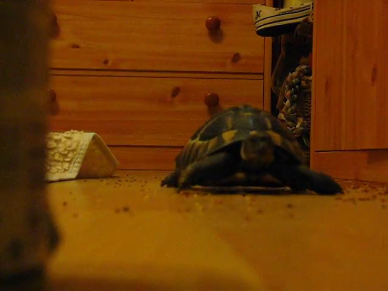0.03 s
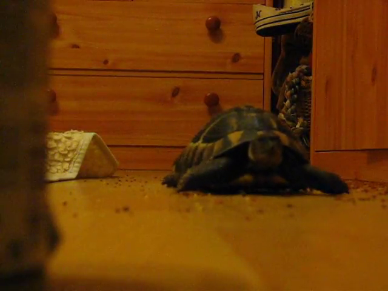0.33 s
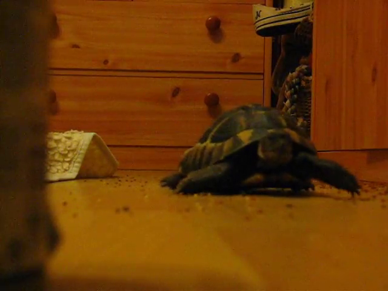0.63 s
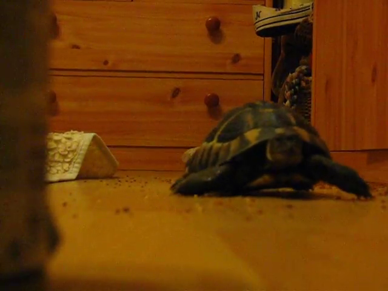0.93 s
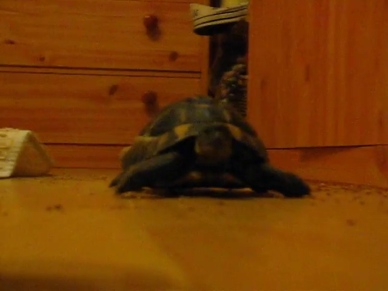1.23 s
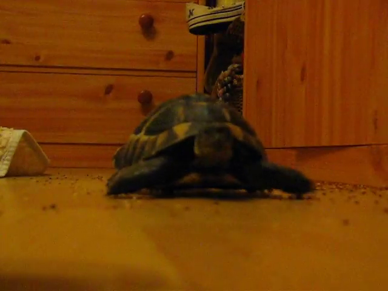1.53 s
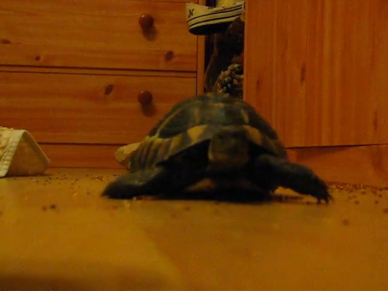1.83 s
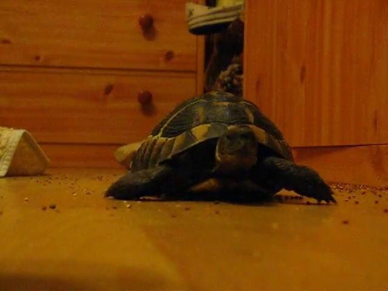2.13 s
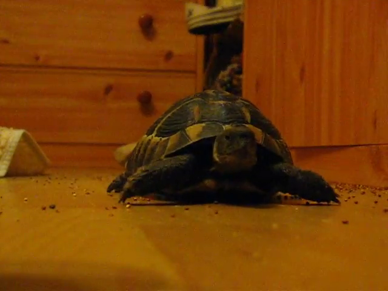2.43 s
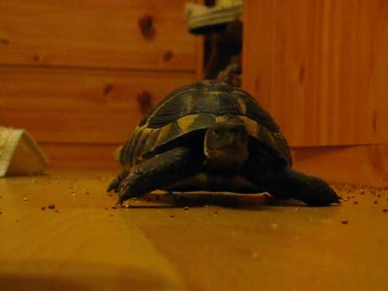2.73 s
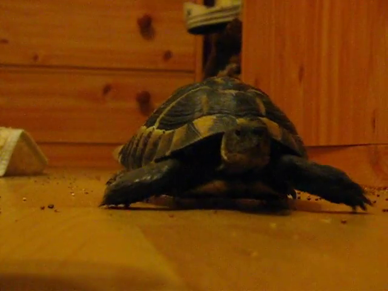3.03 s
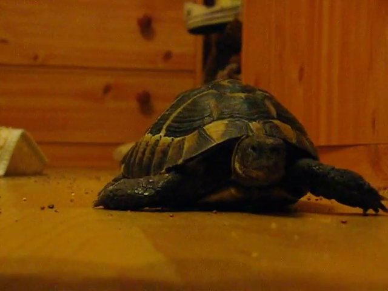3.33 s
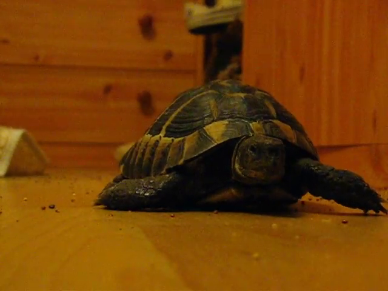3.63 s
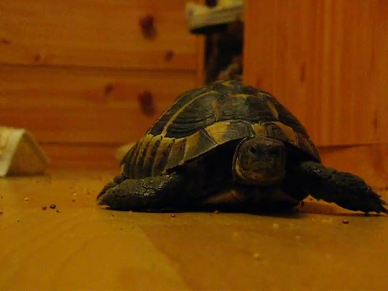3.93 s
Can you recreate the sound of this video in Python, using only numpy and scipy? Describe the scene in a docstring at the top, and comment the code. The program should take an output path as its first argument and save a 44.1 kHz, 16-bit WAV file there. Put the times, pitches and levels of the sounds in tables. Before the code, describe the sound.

A tortoise scrapes and shuffles over a wooden floor, with a few sharp knocks.

```python
"""Uneven, gritty scraping in a quiet room: a tortoise drags its claws and shell over a wooden floor.
Its claws click on grit, and now and then a foot sticks and slips, making the hollow shell judder.
Scattered knocks ring the boards and bunch up near the end, around two close, crackling scrapes
on the left. Faint room noise, hum and whir lie underneath. An automatic volume control turns
everything down after the loudest sounds, then slowly back up."""
import sys
import numpy as np
from scipy import signal
from scipy.fft import rfft, irfft
from scipy.io import wavfile
from scipy.ndimage import uniform_filter1d

SR = 44100
rng = np.random.default_rng(int(sys.argv[2]) if len(sys.argv) > 2 else 0)


def waveform_to_disk(signal):
    """Save audio, clipped to [-1, 1], as 16-bit WAV at the path in sys.argv[1]."""
    frames = np.transpose(np.atleast_2d(signal))
    scaled = np.clip(frames, -1, 1) * 32767
    samples = np.round(scaled).astype(np.int16)
    wavfile.write(sys.argv[1], SR, samples)


N = 176400
T, HZ = np.arange(N) / SR, np.fft.rfftfreq(N, 1 / SR)

# How much louder distant sounds are on the left: pitch_hz, left_minus_right_db
FAR_SIDE_BALANCE = [(100, -1), (750, 0), (2000, -1), (3300, -5), (5500, 0), (9000, -7), (12500, 5.5),
                    (15000, 1)]


def amp(db):
    """Turn decibels into a multiplier."""
    return 10 ** (np.asarray(db) / 20)


def unit(x):
    """Scale a signal to an average power of 1."""
    return x / np.sqrt(np.mean(x ** 2) + 1e-20)


def read(points, hz):
    """Look up a value between the rows of a table, on a musical pitch scale."""
    pitch_hz, value = np.transpose(points)
    return np.interp(np.log(hz + 1), np.log(pitch_hz + 1), value)


def colour(x, tone):
    """Filter a sound to a tone curve; only the curve's shape counts, not its overall level."""
    log_gain = np.log(amp(read(tone, abs(np.fft.fftfreq(4096, 1 / SR)))))
    response = np.exp(np.conj(signal.hilbert(log_gain)))  # rings after a click, never before
    taps = np.fft.ifft(response).real[:2048]
    return signal.oaconvolve(x, taps / np.linalg.norm(taps))[:N]


def drift(rate_hz):
    """A random wobble, mostly slower than rate_hz."""
    return unit(irfft(rfft(rng.standard_normal(N)) / (1 + (HZ / rate_hz) ** 4), N))


def clicks(times_s, levels_db):
    """One sharp spike for each contact."""
    x = np.zeros(N)
    x[np.clip(np.round(times_s * SR).astype(int), 0, N - 1)] = amp(levels_db)
    return x


def resonate(x, hz, width_hz):
    """Pick out a band of sound around a moving pitch."""
    turn = np.exp(2j * np.pi * np.cumsum(hz) / SR)
    hold = np.exp(-np.pi * width_hz / SR)
    return 2 * (turn * signal.lfilter([1 - hold], [1, -hold], x / turn + 1e-18)).real


def pan(pair, balance, left_lead_s=0):
    """Set how much louder and earlier a sound is on one side."""
    half = amp(read(balance, HZ) / 2) * np.exp(1j * np.pi * HZ * left_lead_s)
    return irfft(rfft(pair) * np.array([half, 1 / half]), N)


def room(x, near_db, near_s, tail_db, tail_s):
    """Add quick echoes from nearby surfaces and a tail that fades 60 dB in tail_s."""
    t = np.arange(SR // 2) / SR
    noise = rng.standard_normal((4, len(t)))
    low = signal.butter(2, 650, fs=SR, output="sos")
    high = signal.butter(2, 650, "high", fs=SR, output="sos")
    scatter = signal.sosfilt(high, noise[:2]) + signal.sosfilt(low, noise[2])  # both sides share the bass
    near = scatter * np.exp(-t / near_s)
    tail = scatter * amp(-60 * t / tail_s) * (t > .007)
    echo = sum(amp(db) * part / np.linalg.norm(part, axis=1, keepdims=True)
               for db, part in [(near_db, near), (tail_db, tail)])
    reflected = signal.oaconvolve(x[None], echo, axes=1)[:, :N]
    return (x + reflected) / np.sqrt(1 + (echo ** 2).sum() / 2)


def moving_echoes(x, step_s, spots, **echoes):
    """Fade from one set of echoes to the next as the point of contact moves."""
    offsets = (T / step_s - np.arange(spots)[:, None] + 1) % spots - 1
    fades = np.cos(np.pi / 2 * np.minimum(abs(offsets), 1))
    return sum(room(x * fade, **echoes) for fade in fades)


def friction(grains_per_s, spread_db, smooth):
    """Grit catches in grains of uneven size over a smooth rub, under a fluttering pressure."""
    catches = rng.random(N) < grains_per_s / SR
    sizes = amp(spread_db * np.minimum(rng.exponential(1, N), 4.5))
    grains = unit(catches * sizes * rng.choice([-1, 1], N))
    rub = smooth * rng.standard_normal(N)
    pressure = amp(1.58 * drift(rate_hz=71.6))
    return unit((grains + rub) * pressure)


def scrape(strokes, hiss_tone, fade_shape, **grain):
    """Each stroke over grit swells and fades as a ringing hiss, a low grind and a fine fizz."""
    # Tone of the low grind and of the high fizz: pitch_hz, level_db
    grind_tone = [(60, 0.5), (180, -15), (350, 2.5), (600, -4), (1100, -4), (1700, -6), (2500, -3),
                  (3600, -7.5), (6000, -17), (12000, -60)]
    fizz_tone = [(4000, -36), (8000, -10), (9500, 1.5), (10700, -1.5), (12000, 2.5), (14000, -6.5),
                 (15800, -16)]
    peak_s, rise_s, fall_s, hiss_db, grind_db, fizz_db, pitch_hz = np.transpose(strokes)
    from_peak = np.maximum((peak_s - T[:, None]) / rise_s, (T[:, None] - peak_s) / fall_s)
    # The power is 10 dB down at rise_s before the peak and at fall_s after it.
    swell = 10 ** -(np.minimum(from_peak, 10) ** fade_shape) + 1e-12
    hiss_gain, grind_gain, fizz_gain = (np.sqrt(swell @ amp(db) ** 2)
                                        for db in (hiss_db, grind_db, fizz_db))
    ring_hz = swell @ (pitch_hz * amp(hiss_db) ** 2) / hiss_gain ** 2  # louder strokes count for more
    grit = friction(**grain)
    hiss = colour(grit, hiss_tone)
    hiss = unit(hiss + amp(3) * resonate(hiss, ring_hz, width_hz=1300))
    grind = colour(friction(**grain), grind_tone)
    fizz = colour(unit(grit + friction(**grain)), fizz_tone)
    return hiss_gain * hiss + grind_gain * grind + fizz_gain * fizz


def shuffle():
    """Feet and shell drag over the floor while claws click on grit."""
    # Foot and shell strokes: peak_s, rise_s, fall_s, hiss_db, grind_db, fizz_db, pitch_hz
    strokes = [(0.005, 0.0073, 0.019, -42, -47, -70, 5900), (0.235, 0.065, 0.032, -42.5, -61, -59, 6600),
               (0.325, 0.073, 0.11, -39, -64.5, -55, 6150), (0.475, 0.028, 0.0073, -36.5, -43, -64, 6400),
               (0.545, 0.044, 0.035, -43.5, -52, -54, 5900), (0.63, 0.044, 0.03, -29.5, -40.5, -56, 4900),
               (0.722, 0.041, 0.018, -40.5, -41, -55, 5100), (0.985, 0.057, 0.093, -41.5, -58, -58, 8200),
               (1.047, 0.018, 0.022, -31, -43.5, -49, 6100), (1.1, 0.042, 0.056, -31, -53, -47.5, 7240),
               (1.165, 0.043, 0.037, -31, -35.5, -44.5, 7200), (1.235, 0.086, 0.03, -38.5, -41, -58, 5750),
               (1.49, 0.043, 0.038, -37.5, -64, -63, 5300), (1.535, 0.022, 0.047, -36.5, -50, -59, 5240),
               (1.64, 0.041, 0.047, -30.5, -42, -47.5, 5050), (1.715, 0.056, 0.032, -34.5, -38, -56, 6300),
               (1.82, 0.049, 0.067, -44, -48, -70, 6500), (1.878, 0.02, 0.0098, -45, -38.5, -58, 6200),
               (2.125, 0.075, 0.021, -40, -45, -57, 5900), (2.185, 0.056, 0.042, -36.5, -62, -52.5, 6600),
               (2.388, 0.07, 0.064, -40.5, -39.5, -60, 6360), (2.452, 0.032, 0.027, -26.5, -60, -50, 6640),
               (2.535, 0.037, 0.033, -26, -49, -43, 6400), (2.635, 0.18, 0.049, -33.5, -42.5, -65, 5140),
               (2.805, 0.01, 0.03, -45, -60, -58, 5600), (2.915, 0.054, 0.025, -35.5, -48, -53, 5940),
               (2.952, 0.021, 0.012, -31.5, -48, -49, 7500), (3.0, 0.038, 0.048, -34.5, -43, -48.5, 5270),
               (3.092, 0.027, 0.041, -31, -46.5, -46, 6800), (3.155, 0.048, 0.031, -27, -44, -45.5, 5900)]
    # Tone of the hiss and the clicks: pitch_hz, level_db
    hiss_tone = [(500, -41), (2000, -21), (3000, -14.5), (3700, -4), (4900, 0.5), (5900, -2), (7000, 0.5),
                 (8200, -4), (9200, -15), (10600, -30), (12300, -17), (15500, -50)]
    # Claws hitting grit: start_s, level_db
    claw_hits = [(0.536, -20), (.716, -15), (1.04, -13), (1.097, -15), (1.147, -8), (1.16, -5), (1.171, -8),
                 (1.251, -10.5), (1.281, -12), (1.482, -20), (1.604, -13), (2.439, -14), (2.797, -12.5),
                 (3.085, -4), (3.239, -24), (3.339, -17), (3.351, -12.5)]
    drags = scrape(strokes, hiss_tone, fade_shape=1.02, grains_per_s=1800, spread_db=4, smooth=.5)
    claws = colour(clicks(*np.transpose(claw_hits)), hiss_tone)
    pair = moving_echoes(drags + claws, step_s=.05, spots=9,
                         near_db=4, near_s=0.0021, tail_db=-1, tail_s=0.21)
    return pan(pair, FAR_SIDE_BALANCE)


def room_noise(hum_hz=100, whir_hz=2647, whir_width_hz=320):
    """A steady soft rush with a faint electrical hum and a thin, flickering whir."""
    # Tone of the quiet room: pitch_hz, level_db
    rush_tone = [(15, -45), (25, -16.5), (113, -0.5), (199, -9.5), (282, -5.5), (509, -9), (783, -15),
                 (896, -12), (1080, -15.5), (1620, -16), (2120, -17), (2630, -17), (3830, -16), (4380, -21),
                 (5890, -17), (7510, -18), (8590, -18.5), (9830, -29.5), (15500, -38)]
    # How alike left and right are: pitch_hz, likeness (1 = the same)
    side_likeness = [(100, .98), (400, 0.98), (800, 0.67), (2500, 0.74), (5000, 0.23), (15000, 0.085)]
    middle, side, whir_noise = rfft(rng.standard_normal((3, N)))
    likeness = np.clip(read(side_likeness, HZ), 0, 1)
    side = side * np.sqrt((1 - likeness) / (1 + likeness))
    rush = unit(irfft(np.array([middle + side, middle - side]) * amp(read(rush_tone, HZ)), N))
    whir_band = irfft(whir_noise / (1 + ((HZ - whir_hz) / (whir_width_hz / 2)) ** 4), N)
    whir = unit(whir_band * np.exp(.35 * drift(rate_hz=22)))
    hum = unit(np.sin(2 * np.pi * hum_hz * T) * (1 + 0.23 * drift(rate_hz=3.3)))
    return pan(amp(-44.5) * rush + amp(-56.5) * whir + amp(-66) * hum, FAR_SIDE_BALANCE)


def knocks(low_cut_hz=120, smear_hz=1800):
    """Each knock is a short rap, duller for a softer contact, plus the thud of the ringing floor."""
    # Knocks on the floor: start_s, rap_db, thud_db, brightness_hz
    hits = [(.425, -21, -37, 1200), (0.461, -13.5, -59, 2500), (1.877, -21.5, -33, 3000),
            (2.113, -10, -44, 1500), (2.368, -16, -38, 2000), (2.382, -7, -26, 4500),
            (3.057, -14.5, -56, 4970), (3.3387, 10.5, -30, 3600), (3.4115, 4.5, -19, 1550),
            (3.429, -8, -27, 1100), (3.435, -12, -21, 600), (3.448, -16, -34, 900),
            (3.4887, -25, -16.5, 695), (3.5246, -2.5, -12, 925), (3.5315, 3, -16.5, 1880),
            (3.58, -5.5, -39, 2020), (3.918, -30, -30.5, 800), (3.972, -2, -27, 1510)]
    # Tone of a rap on wood: pitch_hz, level_db
    rap_tone = [(60, -30), (250, 3), (500, 6), (850, 8), (1200, 0), (1700, 3), (2600, -3.5), (3800, -5.5),
                (5500, -5.5), (7000, -1), (15000, -7)]
    # Notes the floor rings at: pitch_hz, level_db, fade_s (time to drop 60 dB)
    floor_notes = [(152, -44, 0.041), (247, -17, .05), (294, -7.5, 0.059), (373, 0, 0.041),
                   (452, -15, 0.055), (712, -20.5, 0.048)]
    raps = sum(signal.sosfilt(signal.butter(2, hz, fs=SR, output="sos"), clicks(start_s, db) + 1e-18)
               for start_s, db, _, hz in hits)
    smear = signal.butter(2, smear_hz, fs=SR)[1]
    raps = signal.lfilter(smear[::-1], smear, raps)  # the boards delay some pitches more than others
    starts_s, _, thud_db, _ = np.transpose(hits)
    t = T[:SR // 4]
    ring = sum(amp(db - 60 * t / fade_s) * np.sin(2 * np.pi * hz * t) for hz, db, fade_s in floor_notes)
    thuds = signal.oaconvolve(clicks(starts_s, thud_db), ring)[:N]
    low_cut = signal.butter(2, low_cut_hz, "high", fs=SR, output="sos")
    wood = signal.sosfilt(low_cut, colour(raps, rap_tone) + thuds)
    return room(wood, near_db=-12, near_s=0.0023, tail_db=-14, tail_s=0.091)


def judders(slips_per_s=210):
    """A foot sticks and slips in quick, uneven jerks that ring the hollow shell."""
    # Bursts of slipping: start_s, length_s, level_db
    bursts = [(0.454, 0.033, -39), (.905, 0.011, -44.5), (1.05, 0.052, -32.5), (1.111, 0.041, -39.5),
              (2.094, 0.036, -37.5)]
    # Tone of the hollow shell: pitch_hz, level_db
    shell_tone = [(100, -29.5), (330, -1), (560, -9), (735, 3), (810, -7), (910, -3.5), (1080, -22),
                  (2500, -26.5), (8000, -35)]
    slip_rate = slips_per_s * (1 + .3 * drift(rate_hz=140.6))
    slips = np.diff(np.floor(np.cumsum(slip_rate) / SR), prepend=0)  # one spike per slip
    level = np.zeros(N)
    for start_s, length_s, db in bursts:
        progress = np.clip((T - start_s) / length_s, 0, 1)
        level += amp(db) * np.sqrt(np.maximum(np.sin(np.pi * progress), 0))
    rough_slips = unit(unit(slips) + 0.84 * rng.standard_normal(N))
    shell = colour(level * rough_slips, shell_tone)
    return room(shell, near_db=-3, near_s=0.006, tail_db=-9, tail_s=0.6)


def close_scrapes():
    """Nearby crackling rubs with little echo reach the left microphone first."""
    # Close strokes: peak_s, rise_s, fall_s, hiss_db, grind_db, fizz_db, pitch_hz
    strokes = [(3.462, 0.056, 0.045, -33.5, -37.5, -43, 7300), (3.51, 0.041, .02, -28, -39, -43.5, 6200),
               (3.538, 0.0065, 0.0051, -11, -13, -21.5, 4820),
               (3.553, 0.0096, 0.023, -19.5, -26.5, -35, 5100), (3.6, .02, 0.015, -33.5, -34, -42.5, 5300),
               (3.79, 0.045, 0.078, -46, -46.5, -55.5, 6700), (3.955, 0.016, 0.015, -30, -36, -43, 5400),
               (3.988, 0.032, 0.057, -22.5, -30.5, -37, 5240)]
    # Single crackles: start_s, level_db
    crackle_hits = [(3.447, -21), (3.461, -1), (3.49, -4.5), (3.538, 8.5), (3.546, -21), (3.711, -16.5),
                    (3.75, -11), (3.788, -11), (3.802, -13), (3.8241, -4), (3.84, -9), (3.862, -14.5),
                    (3.9219, -2), (3.9412, -6), (3.9488, -1), (3.9542, -1.5), (3.9565, 1), (3.975, 3),
                    (3.9838, -3), (3.9875, 6), (3.9915, 7.5)]
    # Tone of the close hiss and of the crackles: pitch_hz, level_db
    hiss_tone = [(500, -41), (2000, -32), (3600, -49), (4300, -7), (4900, -4), (6500, 2.5), (8600, -4.5),
                 (10000, -25), (12300, -21), (15800, -62)]
    crackle_tone = [(500, -37), (3500, -9), (4800, 0), (6600, 7.5), (8600, 2.5), (10300, -8.5), (12300, -8),
                    (15800, -20)]
    rubs = scrape(strokes, hiss_tone, fade_shape=0.93, grains_per_s=3500, spread_db=1, smooth=0.17)
    crackles = colour(clicks(*np.transpose(crackle_hits)), crackle_tone)
    pair = moving_echoes(rubs + crackles, step_s=.035, spots=5,
                         near_db=0, near_s=0.00098, tail_db=-11, tail_s=0.058)
    # How much louder close sounds are on the left: pitch_hz, left_minus_right_db
    side_balance = [(100, 4.5), (700, 0.5), (2400, 7.5), (4400, 3.5), (8100, -1), (12500, 16.5), (15000, 2)]
    return pan(pair, side_balance, left_lead_s=0.0002235)


def scene():
    """Add up all the sounds at the left and right microphones."""
    return shuffle() + judders() + knocks() + close_scrapes() + room_noise()


def record(dry, threshold_db=-22, cut_db_per_db=0.29, release_db_per_s=16, attack_s=0.028, top_hz=15750):
    """Turn the volume down after loud sounds and slowly back up, then clip peaks and cut the top treble."""
    power = abs(uniform_filter1d((dry ** 2).mean(0), size=440))
    power_db = 10 * np.log10(power + 1e-12)
    fall_db = T * release_db_per_s
    held_db = np.maximum.accumulate(power_db + fall_db) - fall_db  # jumps to each peak, then sinks
    over_db = np.maximum(held_db - threshold_db, 0)
    hold = np.exp(-1 / (attack_s * SR))
    cut_db = cut_db_per_db * signal.lfilter([1 - hold], [1, -hold], over_db)
    clipped = np.clip(dry / amp(cut_db), -1, 1)
    treble_cut = signal.firwin(511, top_hz, window=("kaiser", 9), fs=SR)
    return signal.oaconvolve(clipped, treble_cut[None], "same")


dry = scene()
out = record(dry)
waveform_to_disk(out)
```